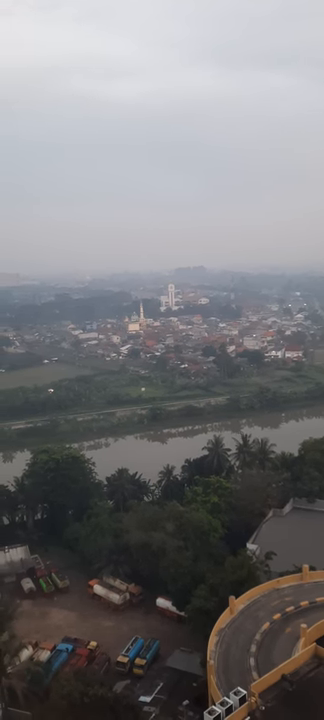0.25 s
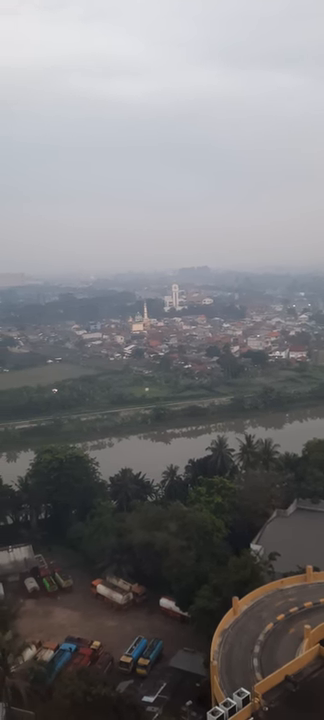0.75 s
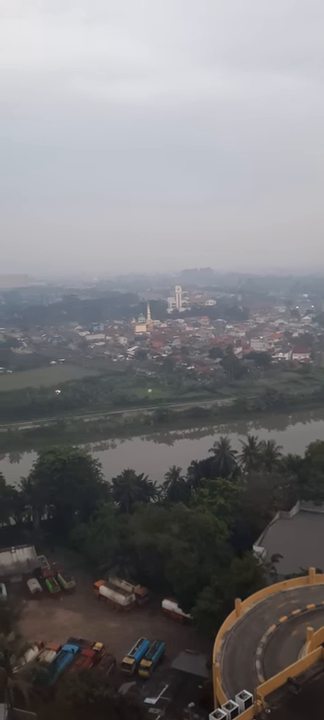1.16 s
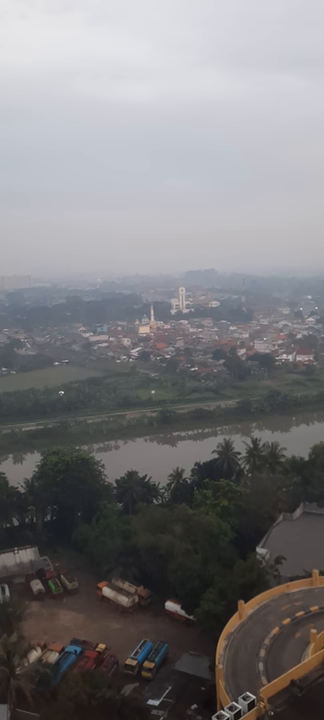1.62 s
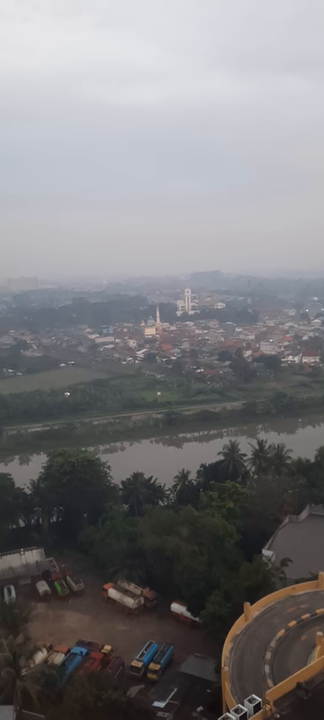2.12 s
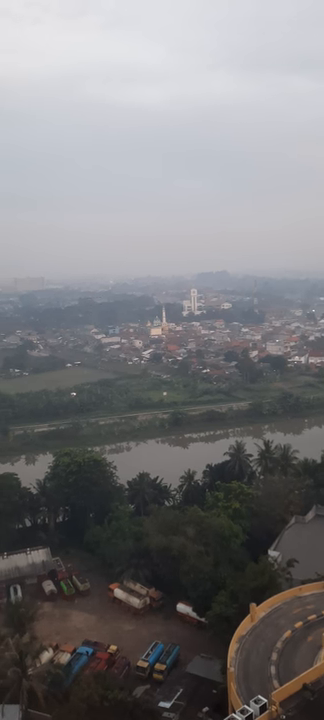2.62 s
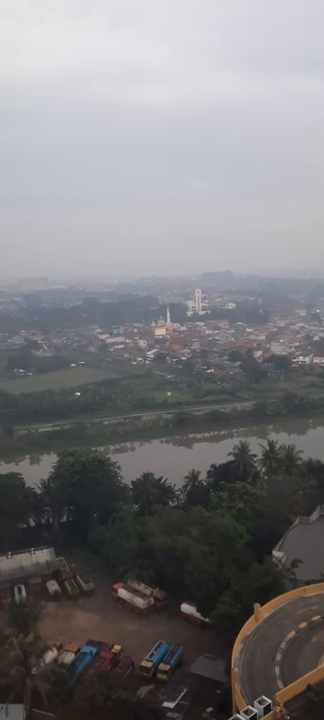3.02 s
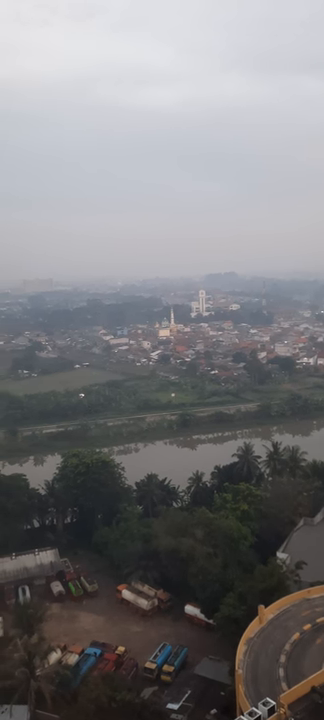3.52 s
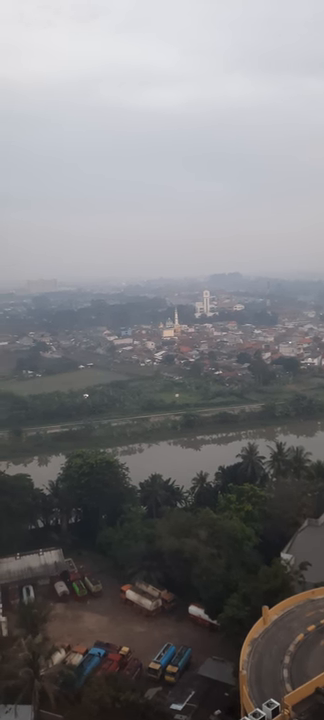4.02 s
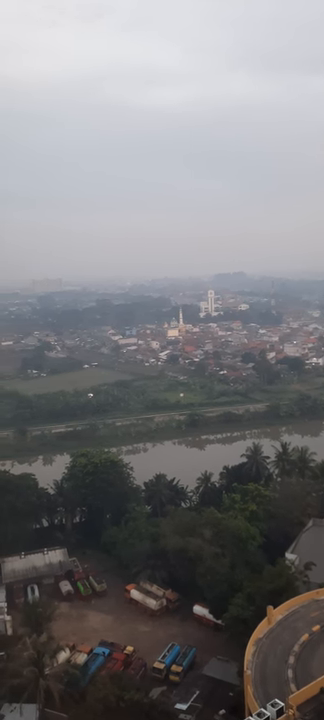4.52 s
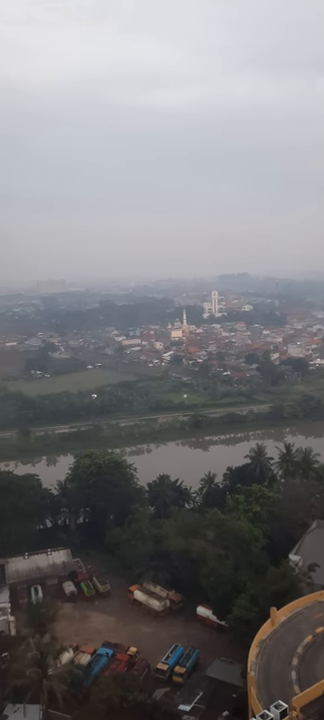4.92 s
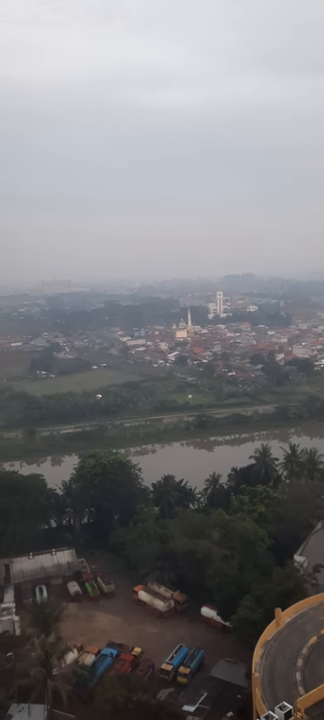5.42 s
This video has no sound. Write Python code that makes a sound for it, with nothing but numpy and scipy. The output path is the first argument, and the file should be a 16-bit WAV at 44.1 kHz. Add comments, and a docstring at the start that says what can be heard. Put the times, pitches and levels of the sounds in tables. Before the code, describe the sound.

From start to finish, about five and a half seconds, air-conditioner compressors hum close by on a balcony high above a town. The low hum is the loudest sound, steady but gently throbbing as neighbouring units and a far engine note beat against it. Fan air adds a low, hollow rumble through casings and ducts. Underneath, distant traffic makes a quieter, even wash with a little tyre hiss. Two very faint, short puffs of hiss pass on the left at about 0.5 and 1.9 seconds. At 2.3 seconds a faint, very high cicada starts with a tiny tick, peaks at 2.5, flutters more weakly and stops by 4.4. The traffic swells slightly around 3 to 3.5 seconds, and another barely audible hiss passes near 4.6. The whole sound leans a little left, and the hum continues to the end.

```python
"""A balcony high above a hazy town. Air-conditioner compressors close by hum at the harmonics of one shaft
speed. Neighbouring units at nearly the same speed beat against them, as does a far engine note. Air flow
rumbles and excites the resonances of casings and ducts, and far traffic washes below. A cicada buzzes briefly,
a few soft puffs of hiss pass, and a vehicle swells by."""
import sys
import numpy as np
from scipy import signal
from scipy.fft import rfft, irfft, next_fast_len
from scipy.io import wavfile

SR = 44100
rng = np.random.default_rng(int(sys.argv[2]) if len(sys.argv) > 2 else 0)


def master(y):
    """Save y as 16-bit WAV."""
    cut = np.clip(np.atleast_2d(y).T, -1, 1)
    pcm = np.round(cut * 32767)  # scale
    wavfile.write(sys.argv[1], SR, pcm.astype(np.int16))


N = 249606
TIME, FFT_SIZE = np.arange(N) / SR, next_fast_len(N)
HZ = np.maximum(np.arange(FFT_SIZE // 2 + 1) * SR / FFT_SIZE, 1)

# Balance of diffuse sound (balance is always left over right): frequency_hz, balance_db
DIFFUSE_BALANCE = [(60, 0.5), (85, 2.1), (120, 2.7), (170, 12), (240, 2.4), (340, 0.81), (490, 4.2),
                   (690, 6.4), (970, 5), (1380, 5), (1960, 3.2), (2770, 9.1)]
# Likeness of diffuse sound at the two microphone ports: frequency_hz, coherence
DIFFUSE_COHERENCE = [(50, 0.81), (200, 0.94), (350, 0.67), (500, 0.39), (1000, 0.55), (1400, 0.34),
                     (2000, 0.78), (3000, 0.094), (4000, 0.77), (12000, 0.2)]
# Spectrum of the microphone's own hiss: frequency_hz, relative_db
MIC_SPECTRUM = [(3000, -116), (9000, -118.5), (12000, -117.5), (16000, -117)]
PORT_LAG_S, CUTOFF_HZ = .00044, 15700   # sound from the left reaches the right port late

# Spectrum of the roar of distant roads: frequency_hz, relative_db
ROAR_SPECTRUM = [(350, -20), (480, -9), (550, -7.5), (680, -0.5), (850, -7.5), (1000, -8), (1180, -8),
                 (1400, -7.5), (1700, -10.5), (2000, -15), (2500, -20), (3000, -23.5), (3600, -37)]
# Spectrum of tyre hiss: frequency_hz, relative_db
TYRE_SPECTRUM = [(2200, -17), (2800, -5), (3400, 1.5), (4050, -4), (4400, -10.5), (5300, -7.5), (6000, -11),
                 (7500, -17.5), (8800, -18), (9500, -26.5), (11000, -34.5)]
# Slow swell of the roar: time_s, level_db
ROAR_SWELL = [(0, -48), (.7, -48), (1.5, -48.5), (2.2, -47.5), (2.85, -47), (3.7, -48), (4.5, -47.5),
              (5.66, -49)]
# Spectrum of fan air and far engines: frequency_hz, density_db
RUMBLE_SPECTRUM = [(20, -75.5), (36, -75), (50, -59.5), (85, -62), (105, -61.5), (135, -67.5), (175, -62.5),
                   (260, -59), (315, -63), (335, -70.5), (430, -67.5), (480, -76), (600, -83)]
# Casings and ducts rung by air flow: centre_hz, width_hz, peak_density_db, added_balance_db
CASING_MODES = [(54.9, 2.6, -51.5, -4), (78.4, 6.7, -52, 3.5), (94.2, 3.5, -55.5, -1),
                (147.5, 5.5, -53, -1), (192, 11, -54.5, -5), (206.4, 11, -54.5, -1), (294, 15, -58, -2),
                (312.7, 11, -57, -1), (339, 3.8, -57, 2), (386.8, 20, -65, 5), (443, 2.1, -67, 0.5),
                (494, 9.8, -70, 0.5), (532, 4.3, -70.5, -2.5), (584.6, 18, -72.5, 4), (635.7, 9.8, -70, 3),
                (780.5, 85, -74.5, -9)]
# Puffs of hiss, and the low, longer swell of a passing vehicle: peak_s, sigma_s, level_db, low_hz, high_hz,
# added_balance_db
PUFFS = [(0.538, 0.022, -67, 4500, 6600, 12), (1.893, 0.028, -72, 3300, 4500, 12),
         (3.404, .5, -60, 683, 893, 4.5), (4.599, 0.22, -77, 5000, 5700, 10.5)]

# The cicada's two bands: centre_hz, width_hz, drone_db, rise_db_per_s, fade_db_per_s
BUZZ_BANDS = [(9820, 320, -92, 81, 44.5), (10900, 1000, -90.5, 119, 34)]
# Swells of its buzz: peak_s, hold_s, lower_band_db, upper_band_db
BUZZ_SWELLS = [(2.48, .02, -76, -70), (2.97, .12, -82, -87), (3.3, .1, -89, -89.5), (3.85, .25, -86, -90)]
# Wide rasp that follows the upper band: low_hz, high_hz, relative_db
BUZZ_RASP = (7600, 10300, -10.5)
CICADA_START_S, CICADA_STOP_S = 2.313, 4.4

# Far engine note just under the second harmonic: time_s, below_hz, level_db
ENGINE_NOTE = [(0, 2.31, -36), (1.1, 0.55, -37.5), (1.75, 2.31, -35), (2.9, 3.08, -36), (3.6, 2.6, -46.5),
               (4.0, 1.63, -48.5), (5.66, 2.22, -44)]
ENGINE_ANTIPHASE_S = 0.073   # a moment when it opposes that harmonic
# Tones of the neighbouring units: harmonic_number, offset_hz, level_db, balance_db, in_phase_s
NEIGHBOUR_TONES = [(1, 0.41, -30.5, -0.9, 3.12), (3, 2.99, -47.6, 3.5, 2.944), (6, 1.59, -44.6, 3.8, 2.634),
                   (9, 3.71, -55.2, 8.2, 2.83)]
# Hum of the nearest compressor: harmonic_number, level_db, balance_db, waver_rad
HUM_HARMONICS = [(1, -32.6, -0.8, 0), (2, -33.1, 2.3, 0), (3, -36.0, 4.7, 0), (4, -34.1, 2.3, 1.15),
                 (5, -49.3, -1.6, 1.25), (6, -42.0, 3.5, 1.0), (7, -48.4, -0.5, .5), (9, -60.0, 2.8, 0)]
SHAFT_HZ = 48.492
WAVER_HZ, WAVER_PEAK_S = 0.529, 2.662   # slow phase swing of the middle harmonics


def amp(db):
    """Amplitude grows tenfold for every 20 dB."""
    return 10 ** (np.asarray(db) / 20)


def over_frequency(table):
    """Interpolation on a logarithmic frequency axis gives each octave equal room."""
    hz, value = np.transpose(table)
    return np.interp(np.log(HZ), np.log(hz), value)


def pan(balance_db):
    """A level difference, split evenly between left and right, places a sound to one side."""
    return amp(np.array([[.5], [-.5]]) * balance_db)


def filtered(sound, gain):
    """Linear filtering multiplies a spectrum by a gain at each frequency."""
    return irfft(rfft(sound, FFT_SIZE) * gain, FFT_SIZE)[..., :N]


def drift(corner_hz):
    """Low-passed noise fluctuates slowly; its standard deviation is 1."""
    slow = filtered(rng.standard_normal(FFT_SIZE), 1 / (1 + (HZ / corner_hz) ** 2))
    return slow / slow.std()


def noise_from_left(low_hz, high_hz, order=2):
    """Path difference: a noise band, rms 1 on the left, reaches the right port late, with scatter."""
    bandpass = signal.butter(order, [low_hz, high_hz], "band", fs=SR, output="sos")
    direct, scatter = signal.sosfilt(bandpass, rng.standard_normal((2, N)))
    right = 0.41 * np.roll(direct, round(PORT_LAG_S * SR)) + .7 * scatter
    return np.array([direct, right]) / direct.std()


def diffuse_noise(gain_per_root_hz):
    """Partial coherence: the right port hears a shared part late and the rest on its own."""
    left, independent = rfft(rng.standard_normal((2, FFT_SIZE))) * np.sqrt(SR / 2)
    coherence = np.clip(over_frequency(DIFFUSE_COHERENCE), 0, 1)
    # Long waves bend round the microphone's body and arrive almost together.
    lag_s = PORT_LAG_S * np.clip((HZ - 300) / 750, .15, 1)
    shared = coherence * np.exp(-2j * np.pi * HZ * lag_s) * left
    right = shared + np.sqrt(1 - coherence ** 2) * independent
    gain = gain_per_root_hz * pan(over_frequency(DIFFUSE_BALANCE))
    return irfft(gain * [left, right], FFT_SIZE)[:, :N]


def road_noise(spectrum, sway_db):
    """Many vehicles add incoherently: half-octave slices of noise each swell on their own; rms 1."""
    noise, out = diffuse_noise(amp(over_frequency(spectrum))), 0
    low_hz, high_hz = spectrum[0][0], spectrum[-1][0]
    octave = np.log2(HZ / low_hz)
    for centre in np.arange(0, np.log2(high_hz / low_hz), .5):
        share = np.clip(1 - 2 * abs(octave - centre), 0, 1)
        out = out + filtered(noise, share) * amp(sway_db * drift(5.5))
    return out / out.std()


def far_traffic():
    """Common amplitude modulation: tyre hiss follows the slow swell of the roar, less deeply."""
    roar_db = np.interp(TIME, *np.transpose(ROAR_SWELL))
    tyres_db = roar_db.mean() - 21 + 0.79 * (roar_db - roar_db.mean())
    roar = amp(roar_db) * road_noise(ROAR_SPECTRUM, sway_db=0.67)
    return roar + amp(tyres_db) * road_noise(TYRE_SPECTRUM, sway_db=1.6)


def air_rumble(sway_db=0.62):
    """Resonance: air flow rings casings and ducts, whose peaks add in power to a low rumble."""
    power = amp(over_frequency(RUMBLE_SPECTRUM)) ** 2 * (HZ < 800)
    for centre_hz, width_hz, peak_db, balance_db in CASING_MODES:
        detuning = 2 * (HZ - centre_hz) / width_hz
        power = power + (amp(peak_db) * pan(balance_db) / (1 + detuning ** 2)) ** 2
    return amp(sway_db * drift(1.5)) * diffuse_noise(np.sqrt(power))


def puffs():
    """Gaussian envelopes on bands of noise give soft-edged puffs of hiss and the longer swell of a passing
    vehicle."""
    out = 0
    for peak_s, sigma_s, level_db, low_hz, high_hz, balance_db in PUFFS:
        envelope = amp(level_db) * np.exp(-.5 * ((TIME - peak_s) / sigma_s) ** 2)
        out = out + envelope * pan(balance_db) * noise_from_left(low_hz, high_hz, order=1)
    return out


def cicada():
    """Clicks too fast to resolve fuse into a buzz: after one tick, high noise bands swell and fade."""
    gate = np.clip(np.minimum(TIME - CICADA_START_S, CICADA_STOP_S - TIME) / .03, 0, 1)
    tick = amp(-75) * np.exp(-.5 * ((TIME - CICADA_START_S) / .002) ** 2)
    out = tick * noise_from_left(9300, 11500)
    peak_s, hold_s, *band_peaks_db = np.transpose(BUZZ_SWELLS)[:, :, None]
    before_s, after_s = np.maximum(peak_s - TIME, 0), np.maximum(TIME - peak_s - hold_s, 0)
    for (centre_hz, width_hz, drone_db, rise, fade), peak_db in zip(BUZZ_BANDS, band_peaks_db):
        swell = amp(peak_db - rise * before_s - fade * after_s).max(axis=0)
        envelope = gate * np.hypot(amp(drone_db), swell) * amp(.8 * drift(40))
        out += envelope * noise_from_left(centre_hz - width_hz / 2, centre_hz + width_hz / 2, order=4)
    low_hz, high_hz, rasp_db = BUZZ_RASP
    rasp = amp(rasp_db) * envelope * noise_from_left(low_hz, high_hz)
    return (out + rasp) * pan(6.5)


def far_engine():
    """Phase is the integral of frequency: the engine's phasor falls behind the second harmonic."""
    time_s, below_hz, level_db = np.transpose(ENGINE_NOTE)
    lag_cycles = np.cumsum(np.interp(TIME, time_s, below_hz)) / SR
    lag_cycles -= np.interp(ENGINE_ANTIPHASE_S, TIME, lag_cycles)
    return -pan(1.9) * amp(np.interp(TIME, time_s, level_db)) * np.exp(-2j * np.pi * lag_cycles)


def neighbours(harmonic):
    """Beating: a neighbouring unit's phasor turns against a harmonic at their difference frequency."""
    return sum(pan(balance_db) * amp(level_db) * np.exp(2j * np.pi * offset_hz * (TIME - in_phase_s))
               for number, offset_hz, level_db, balance_db, in_phase_s in NEIGHBOUR_TONES
               if number == harmonic)


def compressors():
    """One suction dip per shaft turn makes a harmonic series; nearby tones superpose on it and beat."""
    out = np.zeros((2, N))
    shaft_rad = 2 * np.pi * SHAFT_HZ * TIME + 0.063 * drift(2.4)   # runs a little ahead or behind
    waver = np.cos(2 * np.pi * WAVER_HZ * (TIME - WAVER_PEAK_S))
    for harmonic, level_db, balance_db, waver_rad in HUM_HARMONICS:
        phasor = pan(balance_db) * amp(level_db) * np.exp(1j * waver_rad * waver)
        phasor += neighbours(harmonic)
        if harmonic == 2:
            phasor += far_engine()
        lead_rad = .06 * harmonic ** 2   # the treble of the dip comes slightly ahead
        scatter_rad = rng.normal(0, .8)   # a random phase for each harmonic softens the chug of the hum
        phase_rad = harmonic * shaft_rad + lead_rad + scatter_rad
        out -= np.sqrt(2) * np.real(phasor * np.exp(1j * phase_rad))
    return out


def scene():
    """Superposition: the pressures of all sources add."""
    return compressors() + air_rumble() + far_traffic() + cicada() + puffs()


def record(dry):
    """Self-noise: the microphone adds faint hiss, partly common to both sides; a low-pass cuts the top."""
    hiss_gain = np.sqrt(SR / 2) * amp(over_frequency(MIC_SPECTRUM))
    common, left, right = filtered(rng.standard_normal((3, N)), hiss_gain)
    hiss = .5 * common + 0.18 * np.array([left, right])
    lowpass = signal.ellip(14, .05, 70, CUTOFF_HZ, fs=SR, output="sos")
    return signal.sosfilt(lowpass, dry + hiss)


dry = scene()
out = record(dry)
master(out)
```